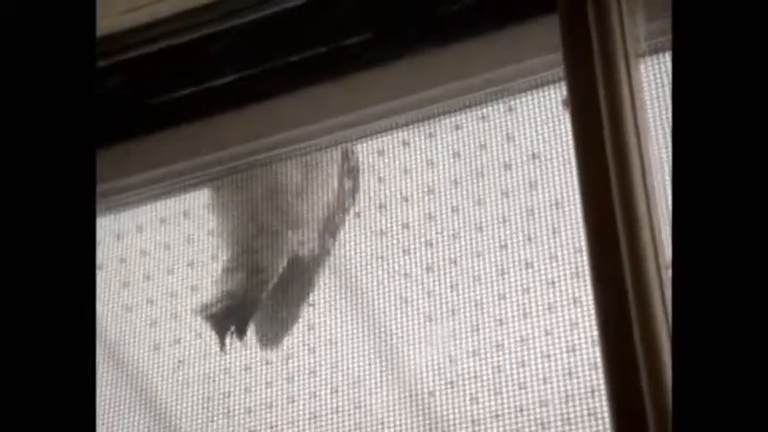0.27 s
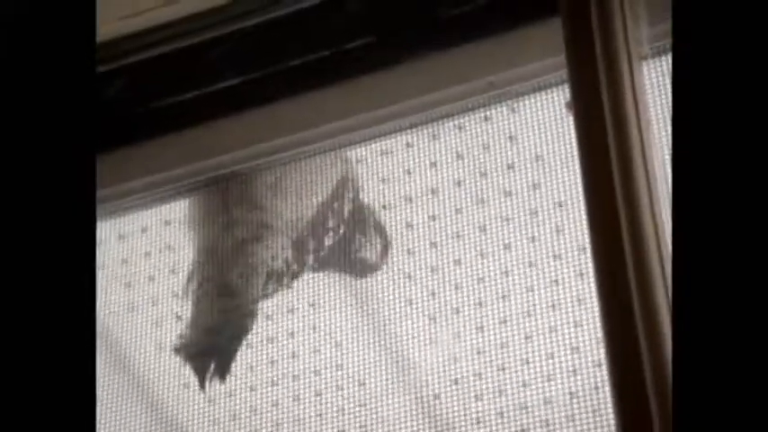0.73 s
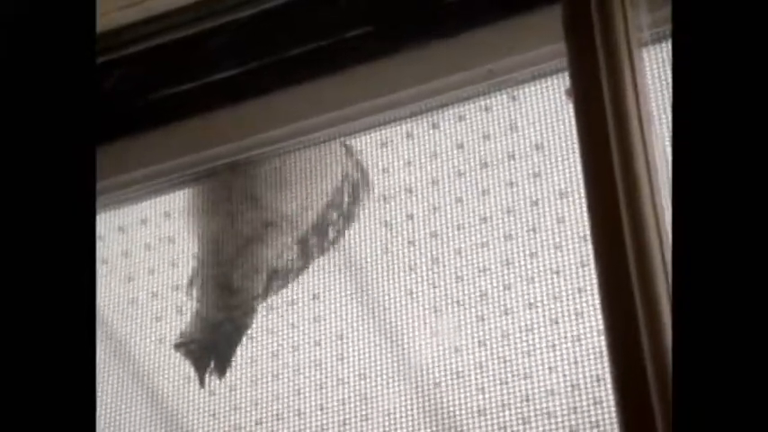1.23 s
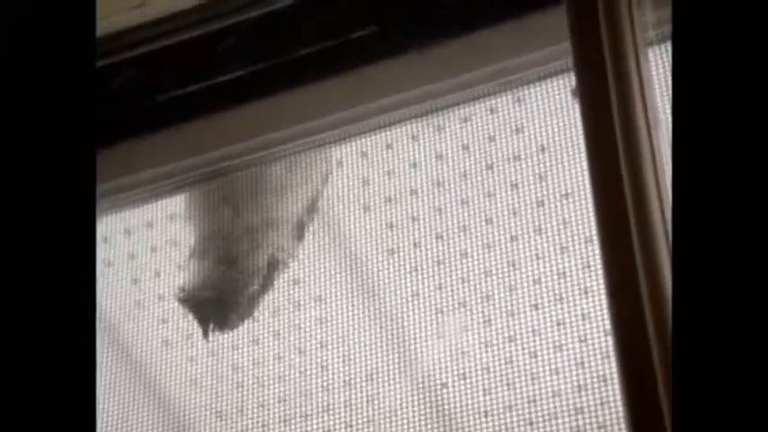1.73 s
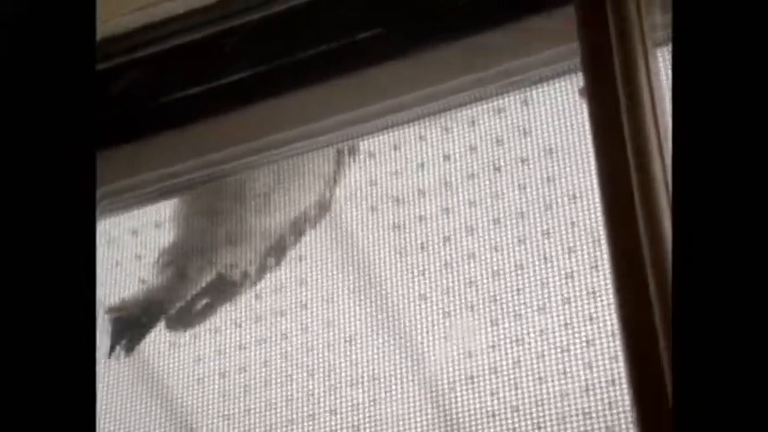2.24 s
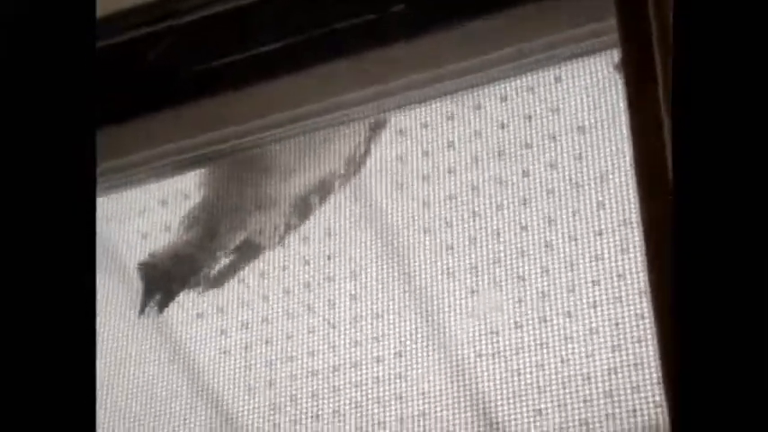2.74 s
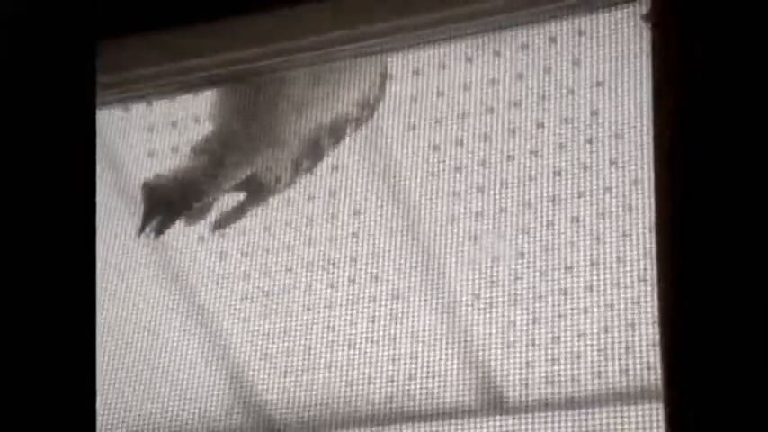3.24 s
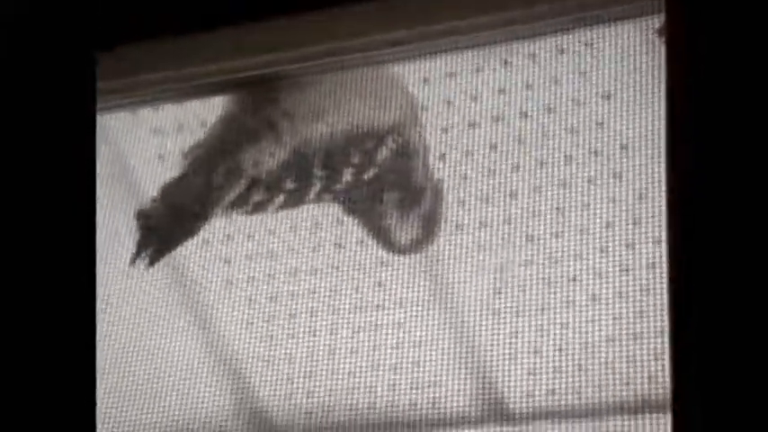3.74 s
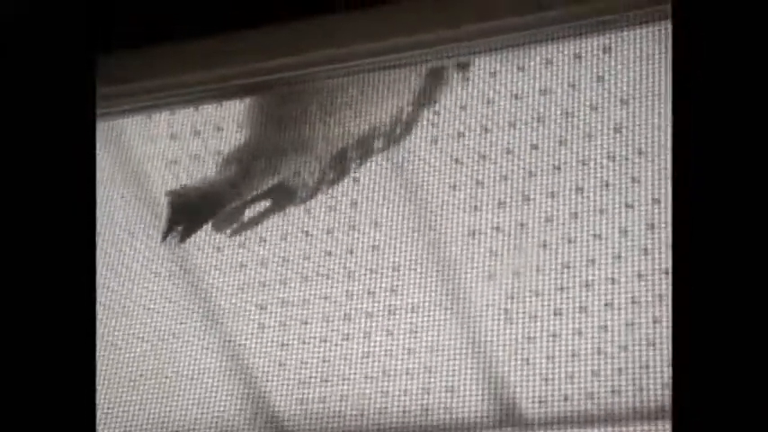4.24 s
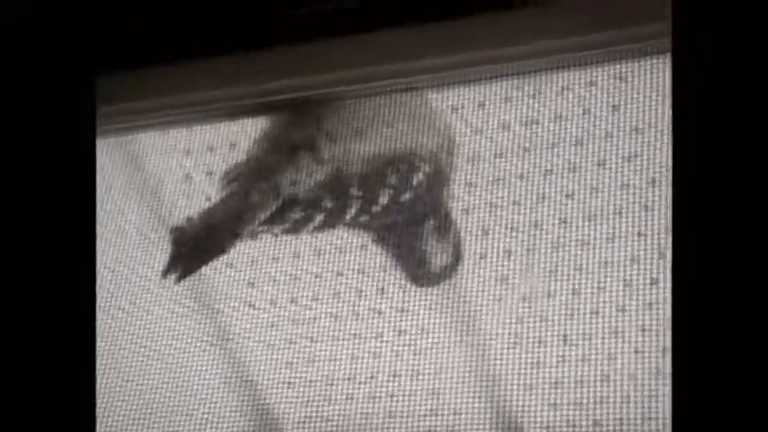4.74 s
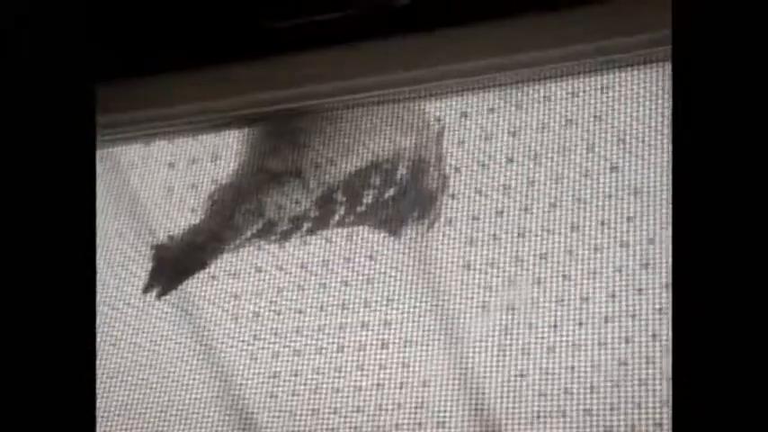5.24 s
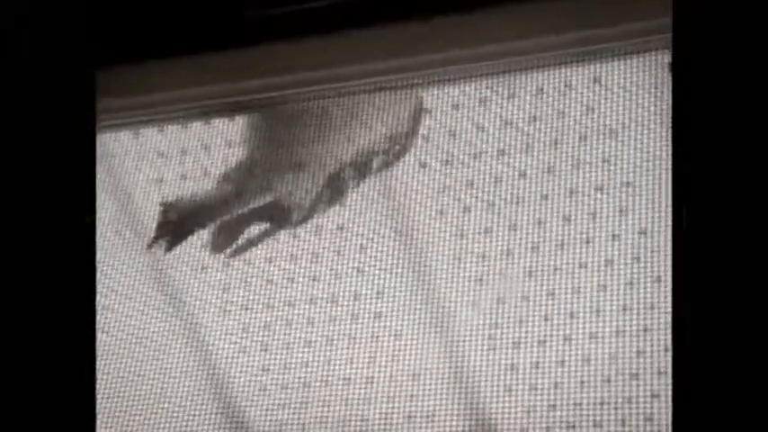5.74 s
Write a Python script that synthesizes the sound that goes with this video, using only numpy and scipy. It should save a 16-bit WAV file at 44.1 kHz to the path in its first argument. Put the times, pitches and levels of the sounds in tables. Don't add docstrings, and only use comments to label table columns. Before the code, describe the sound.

A woodpecker knocks in short irregular bursts on dried mud outside a window, frame and screen clattering, over a low fan hum.

```python
import sys
import numpy as np
from scipy import signal
from scipy.fft import rfft, irfft
from scipy.io import wavfile
from scipy.ndimage import uniform_filter1d, map_coordinates

SR = 44100
rng = np.random.default_rng(int(sys.argv[2]) if len(sys.argv) > 2 else 0)


def master(y):
    cut = np.clip(np.atleast_2d(y).T, -1, 1)
    pcm = np.round(cut * 32767)
    wavfile.write(sys.argv[1], SR, pcm.astype(np.int16))


def invert_db(x):
    u = np.asarray(x, float) / 20
    return 10 ** u


N = 264600

# (frequency [Hz], level [dB])
AIR_SPECTRUM = [(20, -40.5), (50, -14.5), (155, -20.5), (230, -7), (375, -15.5), (1150, -19), (2370, -34.5),
                (10000, -42.5)]
# (frequency [Hz], level [dB rms], unsteadiness [dB])
MOTOR_HUM = [(54, -58.5, 3.5), (117.6, -59, 3), (201.6, -56.5, 4), (236.9, -47.5, 1), (263, -66, 2),
             (498.6, -58, 3.5)]

# (time [s], peak level [dB], length [s], brightness [dB per octave])
RUSTLES = [(.005, -36, 0.0081, 1), (0.018, -36, 0.023, -2), (0.041, -38.5, 0.0093, 0),
           (0.047, -38, 0.016, 1), (0.076, -45, 0.021, -8.5), (0.089, -31, 0.011, -6),
           (0.129, -34, 0.0089, -5), (.144, -35.5, 0.018, 4), (.178, -30, 0.0022, 5),
           (0.227, -34.5, 0.02, -7), (1.545, -35.5, 0.013, -2.5), (1.636, -41.5, 0.013, -1.5),
           (1.65, -44, 0.016, -4.5), (1.665, -42, 0.014, -2), (1.83, -37.5, 0.0069, -0.5),
           (2.059, -28.5, 0.008, -6), (2.072, -33, 0.018, -6.5), (2.148, -37, .012, -2),
           (2.581, -43, 0.015, -2.5), (2.622, -32, 0.01, -8), (3.647, -31.5, 0.0028, -9),
           (5.031, -32, 0.0023, -11)]
# (frequency [Hz], level [dB])
FEATHER_SPECTRUM = [(500, -21.5), (1000, 1.5), (1600, -5), (2300, 2), (3500, -4), (5000, 0), (7500, -1.5),
                    (10000, 4.5)]

# (time [s], peak level [dB], pane level [dB], screen level [dB], beak crack level [dB])
BLOWS = [(1.5647, -8.5, -9, -20, -27), (1.9146, -11.5, -10.5, -24.5, -28.5),
         (2.0201, -3.5, -6, -25.5, -18.5), (2.677, -10, -8.5, -29.5, -21),
         (2.7763, -4.5, -7.5, -18.5, -25.5), (2.8884, -4, -5.5, -19.5, -11), (3.2577, -17, 0, -16.5, -15),
         (3.3517, -10, -7.5, -22, -24), (4.0748, -8, -7, -19.5, -25.5), (4.1774, -5.5, -4.5, -20.5, -20),
         (4.282, -5.5, 0, -16, -14.5), (5.638, -11, 0.5, -11.5, -15), (5.9364, -15, -7.5, -22.5, -27),
         (6.012, -5, -9, -20, -20)]
# (frequency [Hz], level [dB], decay t60 [s])
FRAME_MODES = [(467.6, 0.54, 0.097), (561.5, -12, 0.13), (705, -1.5, 0.033), (634, -15, 0.17),
               (620, -15, 0.21), (528, -19, 0.24), (754, -28.5, 0.13), (342, -24, .25), (850.3, -26, 0.31),
               (1020.5, -15.5, 0.13)]
# (frequency [Hz], level [dB], decay t60 [s])
PANE_MODES = [(1063, 3, 0.0092), (1182, 8.5, 0.012), (1414, -5.5, 0.066), (1595, -3, 0.024)]
# (frequency [Hz], level [dB], decay t60 [s])
SCREEN_MODES = [(1870, -0.5, 0.033), (1910, 5, 0.013), (2283, 6.5, 0.015), (2550, -5, 0.052),
                (2780, -3, 0.0072)]
# (frequency [Hz], level [dB], decay t60 [s])
WALL_MODES = [(151, -16, 0.054), (219.5, -5.5, 0.28), (320, -45.5, 0.2), (546, -11, 0.13), (633, -12, 0.14),
              (742, -12.5, 0.18), (852, -2, 0.2), (919, -10, 0.14), (990, -21, 0.16), (1080, -21.5, 0.16)]
# (frequency [Hz], level [dB], decay t60 [s])
SILL_MODES = [(111.7, -5.5, 0.099), (166, -1.5, 0.13), (209.8, -2, 0.19), (265, 2.5, 0.089),
              (321, -5, 0.21)]
# (frequency [Hz], level [dB per Hz])
CRACK_SPECTRUM = [(1800, -42), (2800, -22), (3500, -13.5), (6000, -6.5), (10000, -4.5)]
# (frequency [Hz], level [dB per Hz])
CRUMBLE_SPECTRUM = [(1800, -31), (2800, 6.5), (4000, 2), (6000, -6.5), (10000, -35)]

# (frequency [Hz], level [dB])
ROOM_SPECTRUM = [(100, -9.5), (300, 1), (500, -13), (850, 6), (1400, -10), (1800, -2), (2400, -5),
                 (8000, -10)]
# (frequency [Hz], decay t60 [s])
ROOM_DECAY = [(120, 0.86), (320, 0.24), (840, 0.31), (1400, 0.26), (2500, 0.27), (6000, 0.27)]

FRAME_TILT_DB, PANE_TILT_DB, WALL_TILT_DB = 0.95, 2, 1.1
KNOCK_DB, KNOCK_RISE_S = -2, 0.0005
ECHO_MS, ECHO_DB = 22.9, -12
RATTLE_MS, RATTLE_SLOWS_MS, RATTLE_LOSS_DB = 1.294, 0.1693, 0.75

BLOCK_S, BLOCK_START_S = 0.036, 0.02
STARVE_HZ, FULL_DB, DB_PER_OCTAVE, TREBLE_HZ = 1600, -17.5, 2.5, 7500
EARLY_S, BURST_S = 0.01, 0.009
TOP_HZ = 10050
GHOST_DB, MIRROR_HZ = -61, 16000


def unit(x):
    return x / np.sqrt(np.mean(x ** 2) + 1e-20)


def along(points, hz):
    f, v = np.transpose(points)
    return np.interp(np.log(hz + 1), np.log(f + 1), v)


def noise(spectrum, size):
    hz = np.fft.rfftfreq(size, 1 / SR)
    white = rng.standard_normal(size)
    return unit(irfft(rfft(white) * invert_db(along(spectrum, hz)), size))


def wobble(rate):
    knots = rng.standard_normal(int(N * rate / SR) + 4)
    return map_coordinates(knots, [np.arange(N) * rate / SR])


def fan():
    t = np.arange(N) / SR
    gusts = invert_db(AIR_DB_MEAN := -43) * invert_db(0.48 * wobble(2.68))
    out = gusts * noise(AIR_SPECTRUM, N)
    for hz, db, sway in MOTOR_HUM:
        level = invert_db(db + 3.5 + sway * wobble(7.4))
        out += level * np.sin(2 * np.pi * hz * t + 0.45 * sway * wobble(6.8))
    return out


def rustle():
    out, t = np.zeros(N + SR), np.arange(SR // 8) / SR
    hz, lift = np.transpose(FEATHER_SPECTRUM)
    for s, db, length, tilt_db in RUSTLES:
        u = t / length
        colour = np.transpose([hz, lift + tilt_db * np.log2(hz / 4000)])
        grains = invert_db(4 * unit(uniform_filter1d(rng.standard_normal(len(t)), size=24)))
        envelope = (1 - np.exp(-8 * u)) * np.exp(-u ** 1.05)
        puff = envelope * unit(grains * noise(colour, len(t)))
        out[round(s * SR):][:len(t)] += invert_db(db - 3.5) * puff
    return out[:N]


def ring(modes, t, scatter_db, rise):
    hz, db, t60 = np.transpose(modes)[:, :, None]
    db = db + scatter_db * rng.standard_normal(hz.shape)
    sign = (-1) ** np.arange(len(hz))[:, None]
    partials = sign * invert_db(db - 60 * t / t60) * np.sin(2 * np.pi * hz * t)
    return partials.sum(0) * (1 - np.exp(-t / rise))


def tilted(modes, slope_db, pivot_hz):
    return [(hz, db + slope_db * np.log2(hz / pivot_hz), t60) for hz, db, t60 in modes]


def later(x, t, ms):
    return np.interp(t - ms / 1000, t, x, left=0)


def clack(modes, t):
    k = np.arange(7)
    delays_ms = 0.752 + RATTLE_MS * k + RATTLE_SLOWS_MS * k ** 2
    x = np.zeros(len(t))
    for ms in delays_ms:
        db = -RATTLE_LOSS_DB * ms - 3.7 * (ms == delays_ms[0])
        x += invert_db(db) * later(ring(modes, t, scatter_db=1.0, rise=0.00037), t, ms)
    return x / np.linalg.norm(x)


def frame_knock(pane_db, t):
    modes = tilted(FRAME_MODES, FRAME_TILT_DB * (pane_db + 9), 564)
    thud = -ring(modes, t, scatter_db=2.43, rise=KNOCK_RISE_S)
    return invert_db(KNOCK_DB) * (thud + invert_db(ECHO_DB) * later(thud, t, ECHO_MS))


def wall_ring(pane_db, t):
    modes = tilted(WALL_MODES, WALL_TILT_DB * (pane_db + 7.5), 430)
    wall = invert_db(-16) * ring(modes, t, scatter_db=1.0, rise=0.013)
    return wall - invert_db(-18.5) * ring(SILL_MODES, t, scatter_db=2.5, rise=0.0032)


def mud_crack(t):
    crack = invert_db(-60 * t / 0.02) * noise(CRACK_SPECTRUM, len(t))
    crumble = invert_db(-3 - 60 * t / 0.058) * noise(CRUMBLE_SPECTRUM, len(t))
    return (1 - np.exp(-(t / 0.00087) ** 2)) * (crack + crumble)


def pecks():
    out, t = np.zeros(N + SR), np.arange(SR // 3) / SR
    early = t[:SR // 4]
    for s, db, pane_db, screen_db, crack_db in BLOWS:
        pane_modes = tilted(PANE_MODES, PANE_TILT_DB * (pane_db + 4), 1100)
        knock = frame_knock(pane_db, early)
        knock += invert_db(pane_db + 20.5) * clack(pane_modes, early)
        knock += invert_db(screen_db + 23.5) * clack(SCREEN_MODES, early)
        body = wall_ring(pane_db, t) + invert_db(crack_db) * mud_crack(t)
        out[round(s * SR):][:len(t)] += invert_db(db) * body
        out[round(s * SR):][:len(early)] += invert_db(db) * knock
    return signal.sosfilt(signal.butter(2, 110, "high", fs=SR, output="sos"), out[:N])


def room(x):
    hz, t, z = signal.stft(rng.standard_normal(SR // 2), SR, nperseg=256)
    build_s = along([(900, 0.0097), (1300, 0.0021)], hz)[:, None]
    build = 1 - np.exp(-(t / build_s) ** 2)
    decay_db = along(ROOM_SPECTRUM, hz)[:, None] - 60 * t / along(ROOM_DECAY, hz)[:, None]
    tail = signal.istft(z * build * invert_db(decay_db), SR, nperseg=256)[1]
    delayed = np.pad(x, (round(0.008 * SR), 0))
    return signal.fftconvolve(delayed, tail / np.linalg.norm(tail))[:N]


def scene():
    bird = pecks()
    return (bird + invert_db(-15.5) * room(bird) + rustle() + fan())[None]


def starved():
    sudden = []
    for s, db, pane_db, *_ in BLOWS:
        octaves_up = max((FULL_DB - db - pane_db) / DB_PER_OCTAVE, 0)
        sudden.append((s, STARVE_HZ * 2 ** octaves_up))
    sudden += [(s, TREBLE_HZ) for s, db, *_ in RUSTLES if db > -38 and s < 3]
    spans = []
    for s, low in sudden:
        start = s - (s - BLOCK_START_S) % BLOCK_S
        if s - start < EARLY_S:
            spans.append((s + BURST_S, start + BLOCK_S, TREBLE_HZ))
        else:
            spans.append((start, s - 0.002, low))
    return [span for span in spans if span[2] < 5000 or span[2] == TREBLE_HZ]


def treble_gaps(hz, t):
    ragged = 350 * unit(uniform_filter1d(rng.standard_normal(len(t)), size=4))
    spans = starved()
    empty = sum((hz + ragged > low) & (t > start) & (t < end) for start, end, low in spans)
    rustling = sum((t > s) & (t < s + length) for s, db, length, _ in RUSTLES)
    empty = empty * (rustling == 0)
    scarce = sum((t > start - 0.01) & (t < end + 0.03) for start, end, _ in spans) > 0
    dice = rng.random((len(hz) // 4 + 1, len(t) // 5 + 1))
    dice = np.kron(dice, np.ones((4, 5)))[:len(hz), :len(t)]
    stray = dice < (0.03 + 0.25 * scarce) * np.clip(hz / 4000 - 1, 0, 1)
    return empty * (dice < 0.9) + stray


def low_pass(x):
    return signal.sosfilt(signal.butter(12, 15700, fs=SR, output="sos"), x)


def record(dry):
    x = dry / (1 + np.abs(dry / 0.74) ** 4) ** (1 / 4)
    hz, t, z = signal.stft(x, SR, nperseg=256, noverlap=192)
    hz = hz[:, None]
    keep = np.where(treble_gaps(hz, t), invert_db(-24.5), 1)
    keep = keep * np.where(hz > TOP_HZ, invert_db(-56), 1)
    x = signal.istft(z * keep, SR, nperseg=256, noverlap=192)[1][:, :N]
    mix = x * (1 + invert_db(GHOST_DB) * np.cos(2 * np.pi * MIRROR_HZ * np.arange(N) / SR))
    return low_pass(mix)


dry = scene()
out = record(dry)
master(out)
```